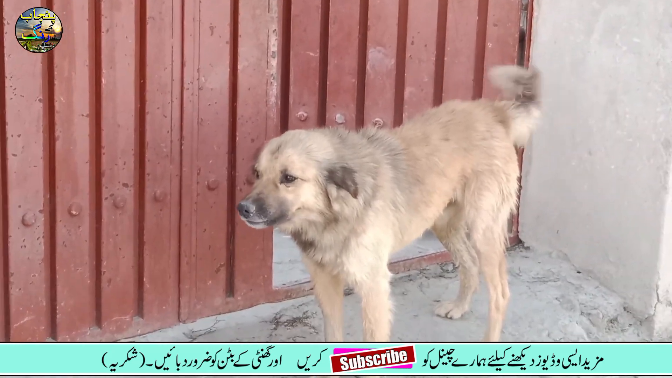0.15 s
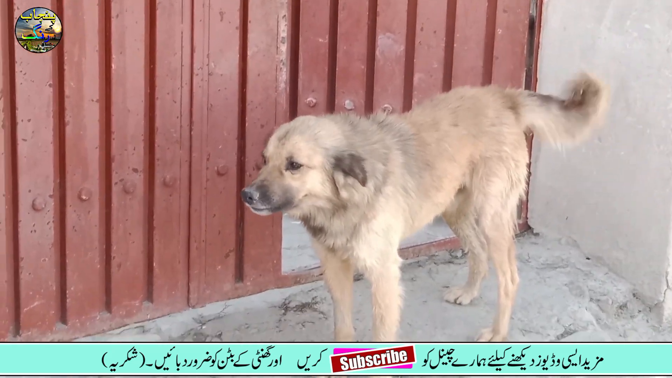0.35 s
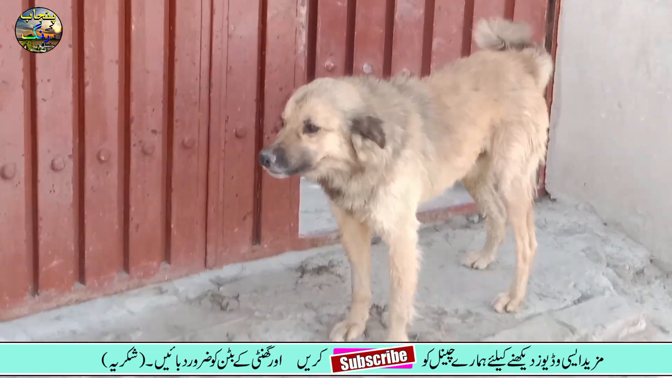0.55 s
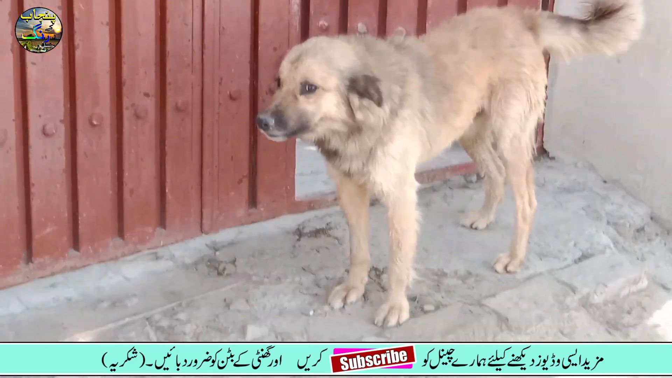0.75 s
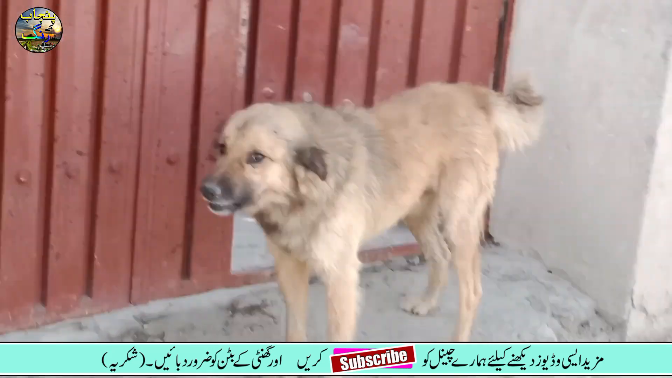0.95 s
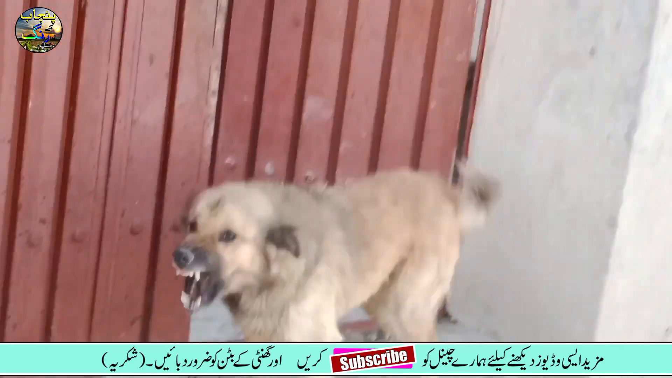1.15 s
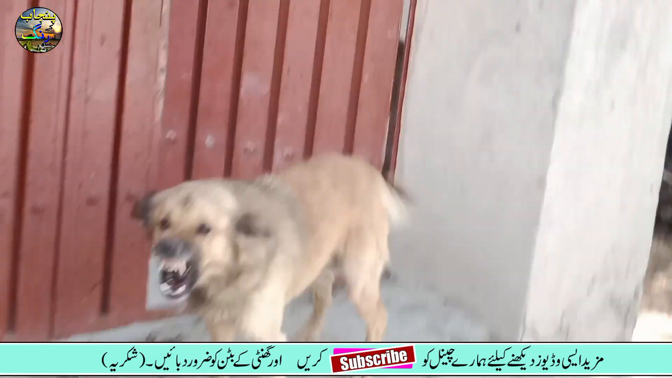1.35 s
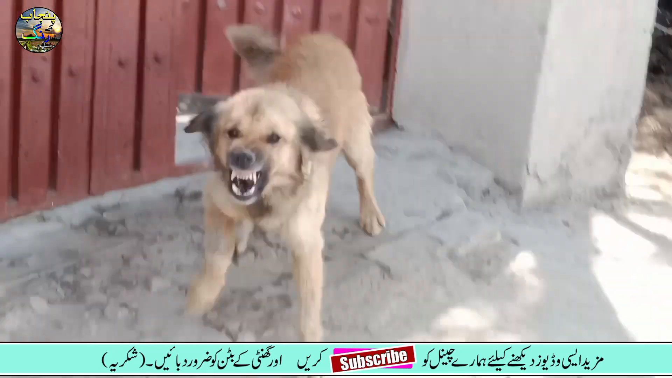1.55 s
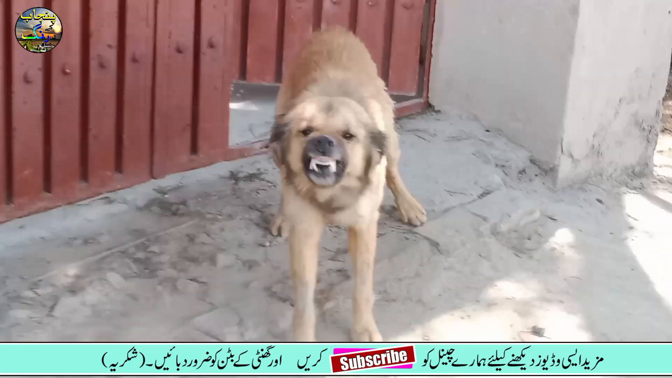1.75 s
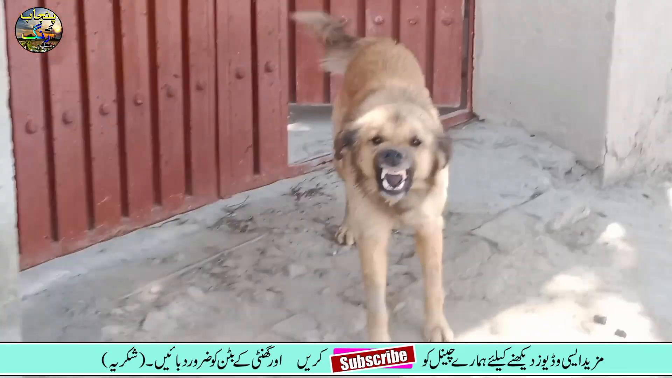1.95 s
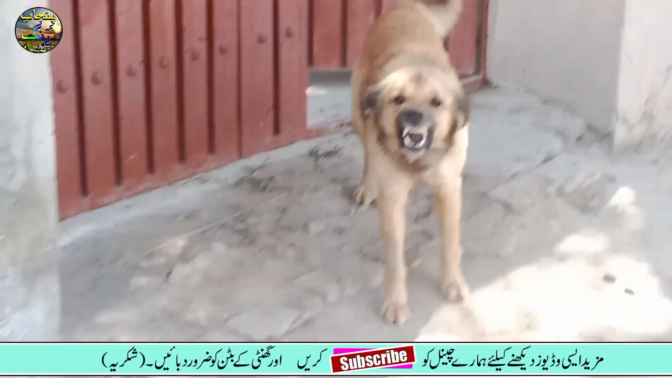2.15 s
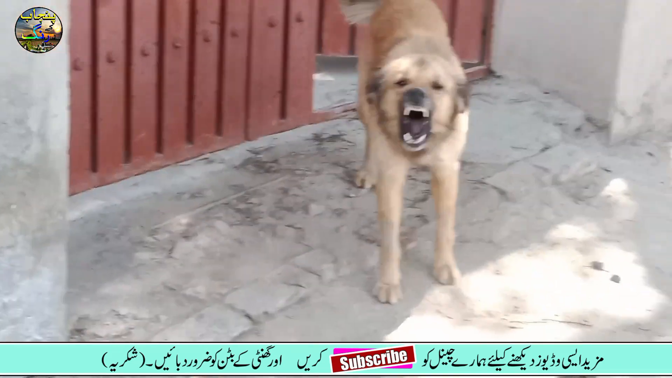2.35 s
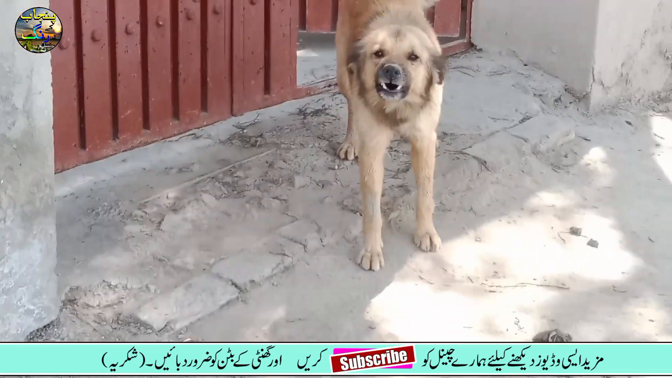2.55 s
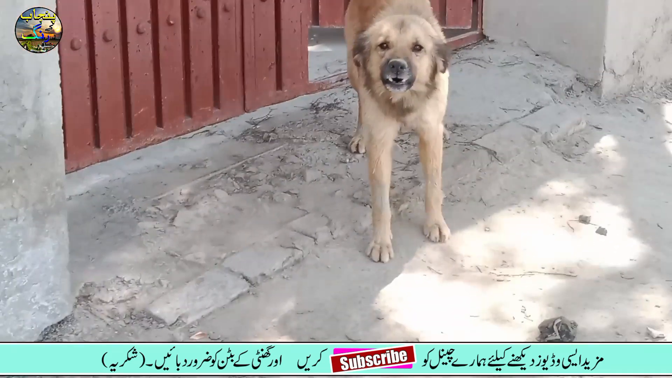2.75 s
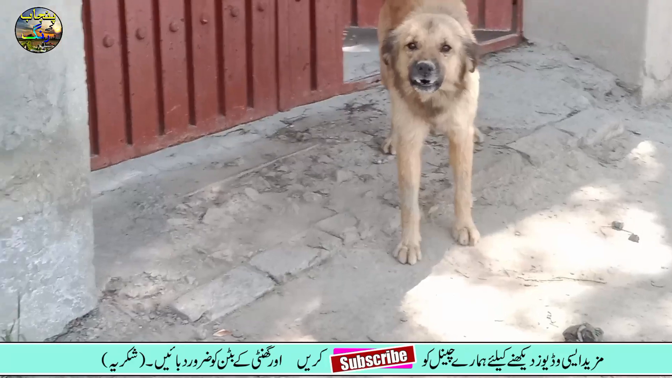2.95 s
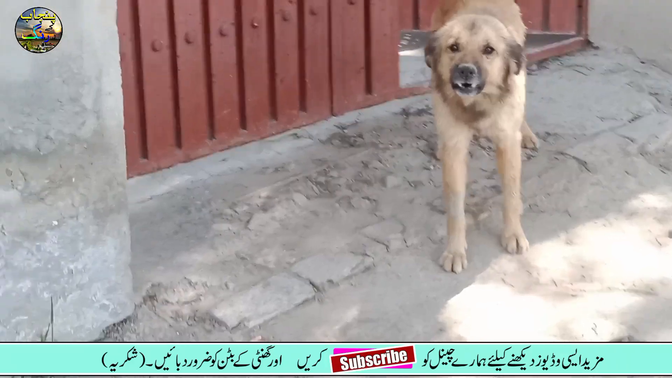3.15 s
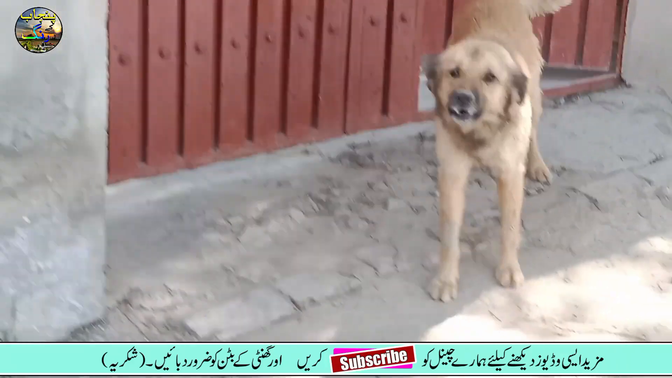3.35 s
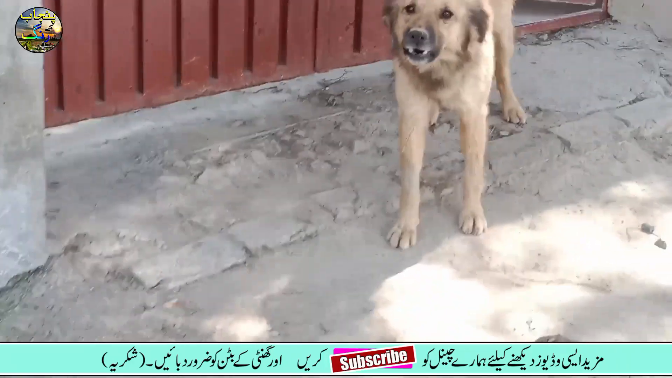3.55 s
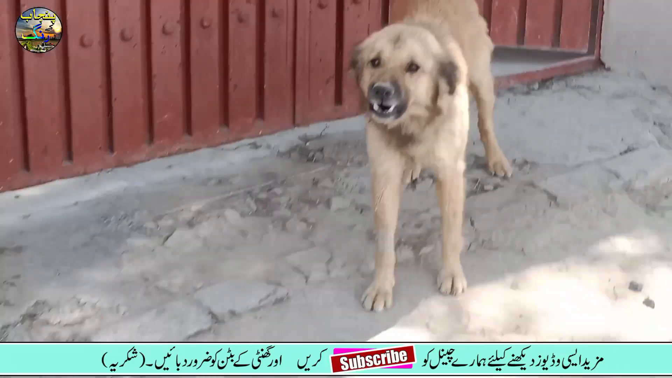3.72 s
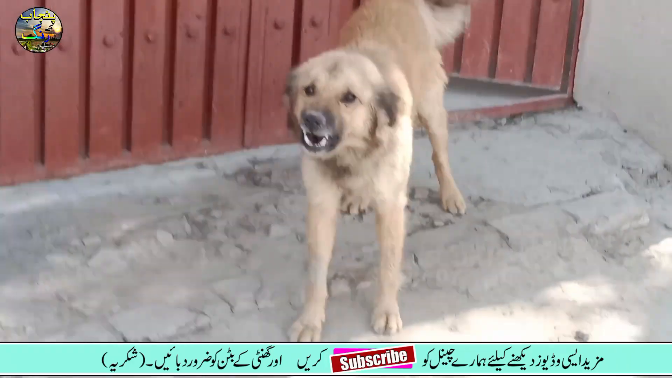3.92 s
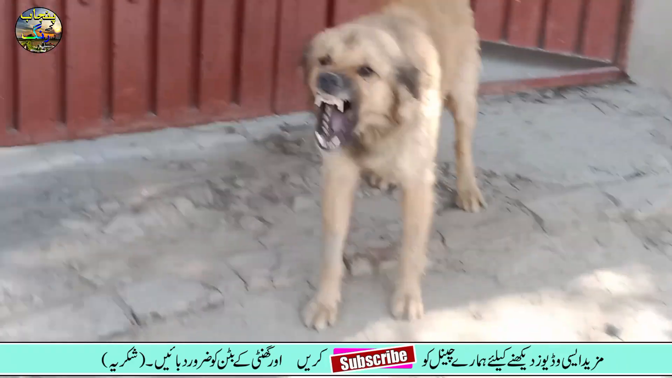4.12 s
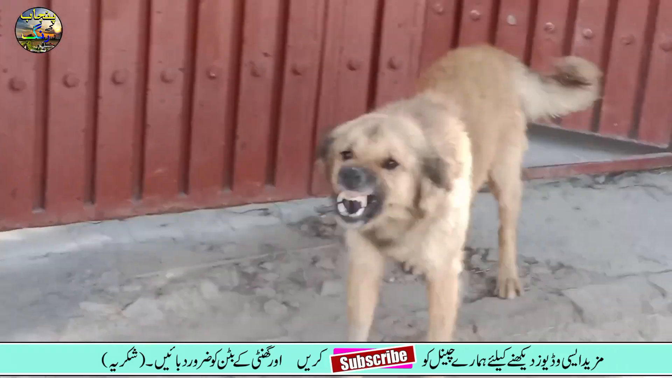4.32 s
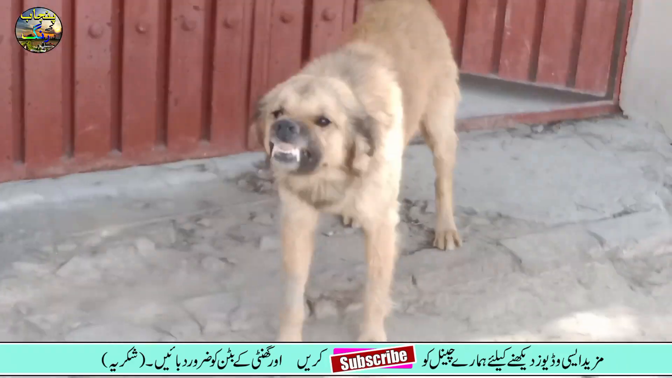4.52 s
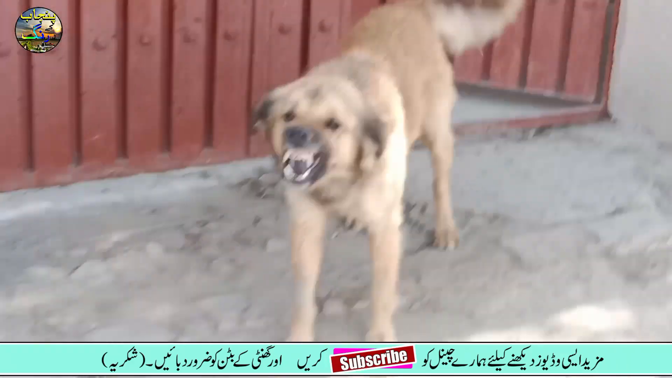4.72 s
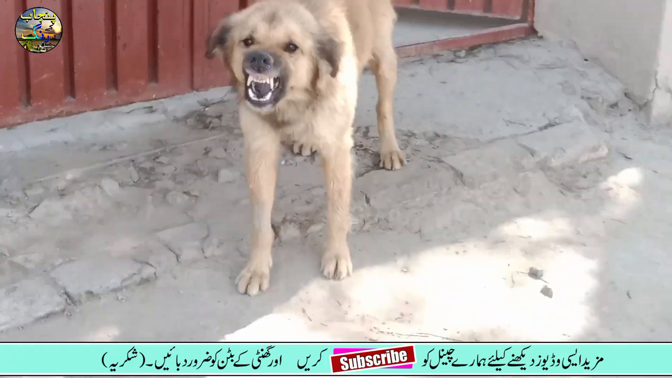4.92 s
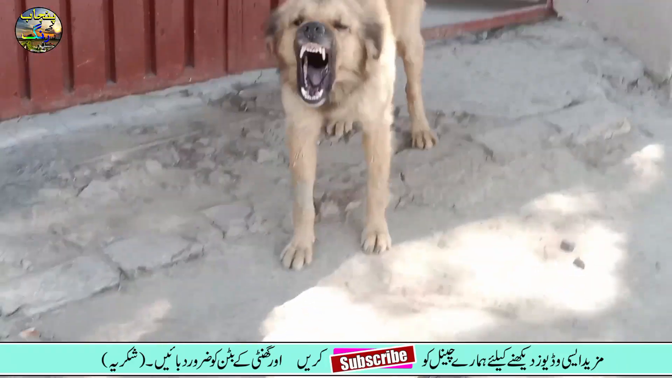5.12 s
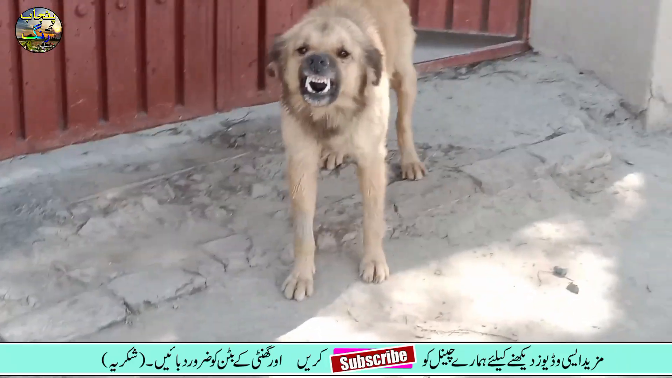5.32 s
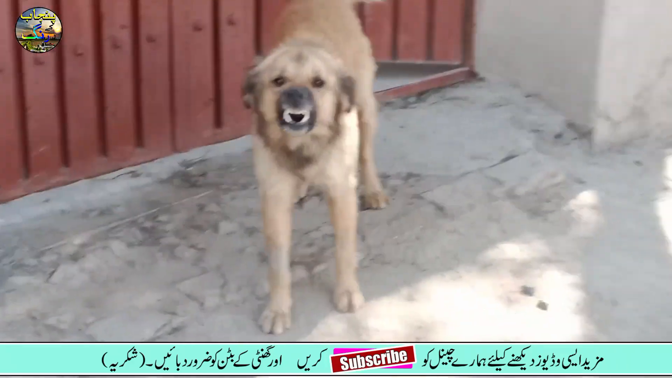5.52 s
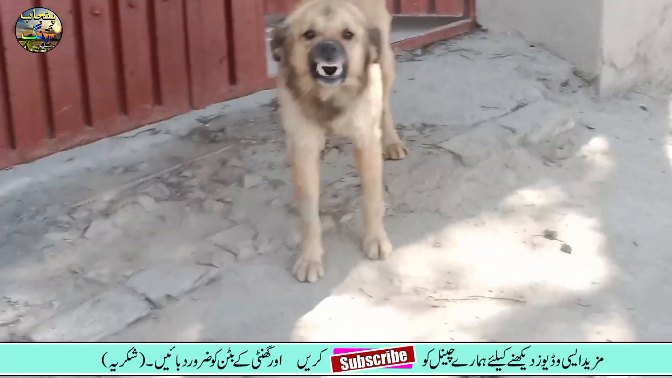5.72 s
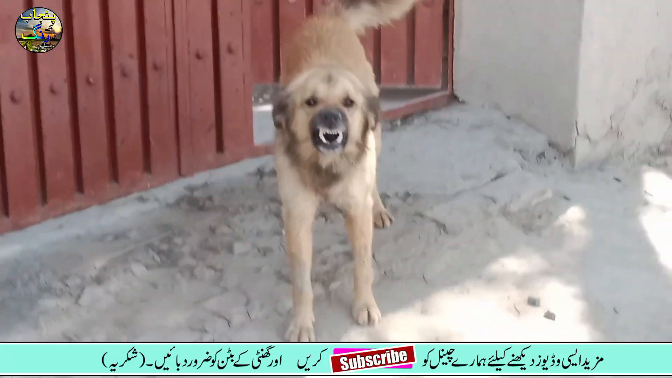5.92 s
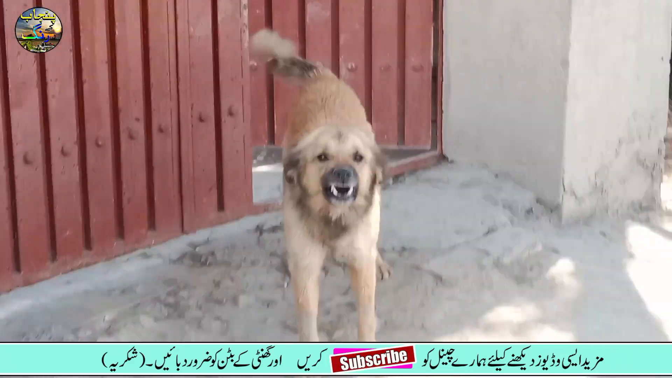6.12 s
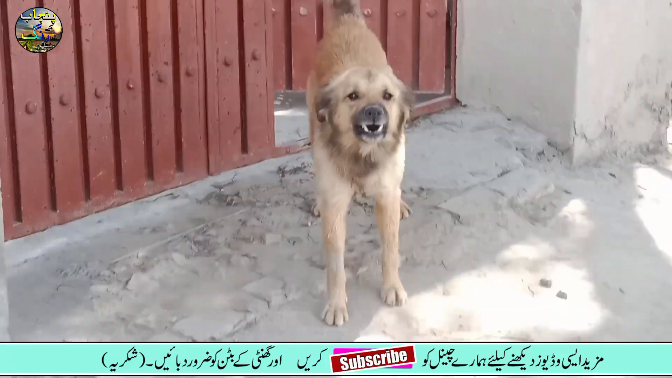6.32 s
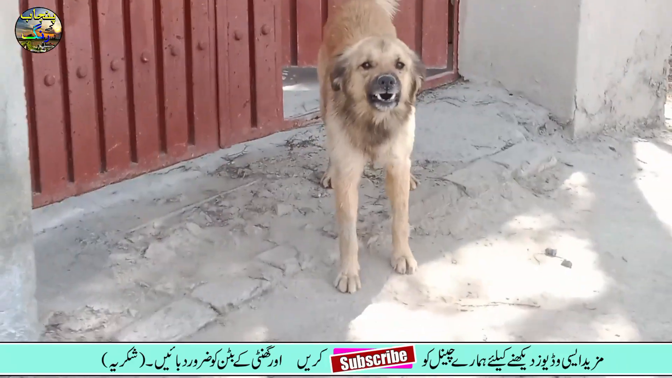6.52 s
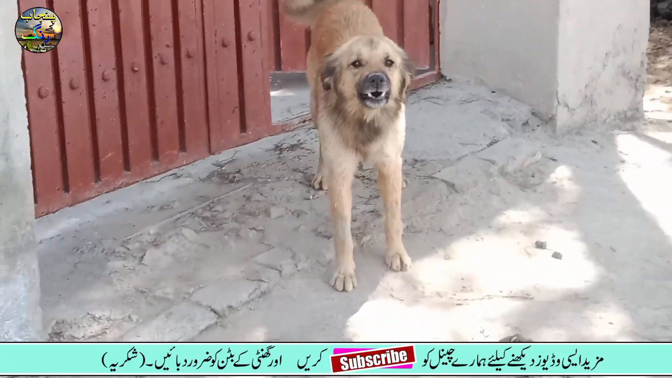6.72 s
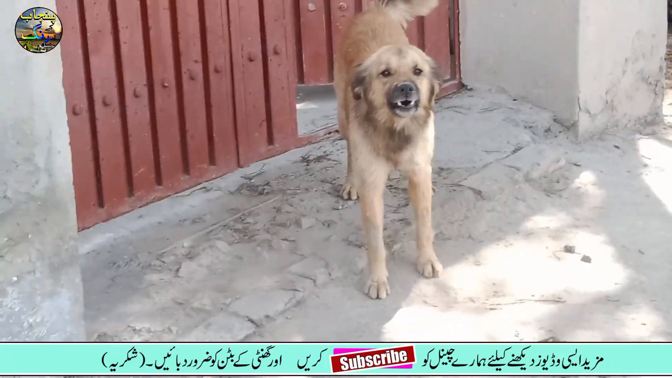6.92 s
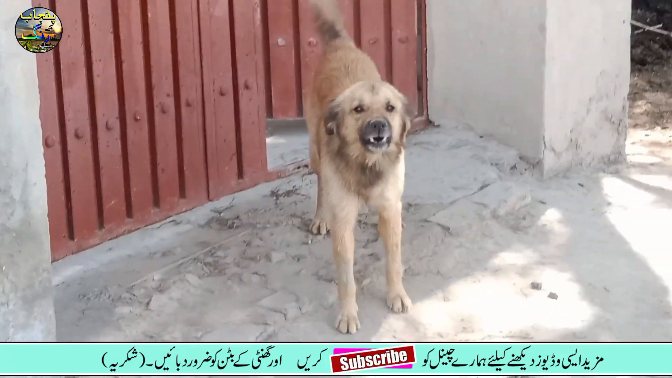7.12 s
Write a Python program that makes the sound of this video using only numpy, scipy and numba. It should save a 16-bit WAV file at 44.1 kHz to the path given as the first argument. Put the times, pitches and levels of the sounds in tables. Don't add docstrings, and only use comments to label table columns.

```python
import sys
import numpy as np
from scipy import signal
from scipy.fft import rfft, irfft
from scipy.io import wavfile
from scipy.ndimage import uniform_filter1d
from numba import njit

SR = 44100
rng = np.random.default_rng(int(sys.argv[2]) if len(sys.argv) > 2 else 0)


def field_ratio(decibels):
    return 10 ** (np.asarray(decibels, dtype=float) / 20)


def unload_wav(signal):
    wavfile.write(
        sys.argv[1],
        SR,
        np.round(np.clip(np.atleast_2d(signal).T, -1, 1) * 32767).astype(np.int16),
    )


N = 316197

# (folds start [s], they lock onto the throat [s], they let go [s], slack tail [s])
BARKS = [
    (1.195, 1.284, 1.35, .08),
    (1.433, 1.527, 1.58, .105),
    (1.696, 1.783, 1.84, .05),
    (2.384, 2.473, 2.525, .175),
    (4.141, 4.24, 4.314, .1),
    (4.443, 4.534, 4.607, .055),
    (5.112, 5.205, 5.243, .18),
]
# (locked pitch [Hz], pitch at letting go [Hz], roughness while locked [0-1],
# tongue resonance [Hz], lips resonance [Hz])
YELPS = [(718, 574, .55, 1000, 1616), (670, 521, .08, 1057, 1660), (645.3, 518, .11, 1028, 1780),
         (643, 650, .08, 1000, 1717), (670.6, 574, .5, 992, 1400), (657.2, 545, 0, 1037, 1600),
         (651, 643, .07, 978, 1478)]


def play(tables, levels, fade_s=0.011):
    rows = np.vstack(tables)
    ends = np.cumsum([0, *map(len, tables)])
    apart = np.diff(rows[:, 0], prepend=-1, append=99)[ends] > .03
    for k, table in enumerate(map(np.array, tables)):
        for edge, side in ((0, -1), (1, 1)):
            if apart[k + edge]:
                silent = table[-edge].copy()
                silent[0] += side * fade_s
                silent[levels] = -110
                rows = np.vstack([rows, silent])
    rows = rows[np.argsort(rows[:, 0])]
    now = np.arange(N) / SR
    return [np.interp(now, rows[:, 0], column) for column in rows[:, 1:].T]


def walk(rate):
    hold = int(SR / rate)
    return uniform_filter1d(np.repeat(rng.standard_normal(N // hold + 1), hold), hold)[:N]


@njit
def svf(x, hz, width):
    y, band, low = np.empty(len(x)), 0., 0.
    for i in range(len(x)):
        g, damping = np.tan(np.pi * hz[i] / SR), width / hz[i]
        v = (band + g * (x[i] - low)) / (1 + g * (g + damping))
        low += 2 * g * v
        band = 2 * v - band
        y[i] = damping * v
    return y


@njit
def folds(hz, jitter, scatter_db, chance):
    pulses, phases = np.zeros(len(hz) + 1), np.empty(len(hz))
    phase, cycle = 0., 0
    for i in range(len(hz)):
        step = hz[i] * np.exp(jitter[i] * chance[cycle, 0]) / SR
        phase += step
        if phase >= 1:
            phase -= 1
            cycle += 1
            size = np.sqrt(SR / hz[i]) * 10 ** (scatter_db[i] * chance[cycle, 1] / 20)
            pulses[i] += size * phase / step
            pulses[i + 1] += size * (1 - phase / step)
        phases[i] = phase
    return pulses[:-1], phases


def larynx(hz, rough, jitter, scatter_db, puff):
    pulses, phase = folds(hz, jitter * rough, scatter_db * rough, rng.standard_normal((N // 40, 2)))
    air = np.exp(-phase / puff) * rng.standard_normal(N) / np.sqrt(puff / 2)
    return np.sqrt(1 - np.clip(rough, 0, 1) ** 2) * pulses + rough * air, air


def tract(x, modes, span_s, order=1):
    y = 0
    for k, (hz, width, db) in enumerate(modes):
        ring = x
        for _ in range(order):
            ring = svf(ring, hz + np.zeros(N), 1. * width)
        y = y + (-1) ** k * field_ratio(db) * ring
    size = int(span_s * SR)
    power = uniform_filter1d(uniform_filter1d(y ** 2, size), size)
    return y / np.sqrt(np.abs(power) + 1e-12)


def bark_gesture():
    t = np.arange(N) / SR
    hz, throat_hz, rough = np.full(N, 120.), np.full(N, 600.), np.full(N, .5)
    for (start, lock, free, _), (top_hz, free_hz, locked, *_) in zip(BARKS, YELPS):
        on = t >= start
        flap_hz = np.interp(t, [start, start + .03, lock], [130, 250, 310])
        arc = 1 - np.clip((t - lock) / (free - lock), 0, 1) ** 2
        yelp_hz = free_hz + (top_hz - free_hz) * arc
        slack_hz = 335 * np.exp(-(t - free) / .21) + (free_hz - 335) * np.exp(-np.abs(t - free) / .009)
        pitch = np.where(t < lock, flap_hz, np.where(t < free, yelp_hz, np.maximum(slack_hz, 95)))
        hz[on] = pitch[on]
        throat_times = [start, start + 0.041, lock, free, free + 0.073]
        throat_hz[on] = np.interp(t, throat_times, [460, 560, top_hz, max(free_hz, 580), 590])[on]
        rough_times = [lock - .012, lock + .006, free, free + .03]
        rough[on] = np.interp(t, rough_times, [.72, locked, locked, .5])[on]
    return uniform_filter1d(hz, 150), throat_hz, rough


def bark_effort():
    # (throat at the onset [dB], flapping [dB], yelping [dB], slack [dB],
    # mouth level added by the gape [dB])
    bark_levels = [(-51.5, -13.5, -10, -35, 0), (-34, -11.5, -10, -34.5, -0.5),
                   (-32.5, -13.5, -10.5, -41.5, 0.5), (-53, -13, -11, -35.5, 1),
                   (-39.5, -13.5, -10.5, -34.5, 1), (-37, -12.5, -10, -44, 0), (-48, -14, -8.5, -32, 1)]
    # (chest re throat [dB], mouth re throat [dB], hiss re throat [dB], tongue rise [Hz])
    stages = [
        (-4.5, -6.5, -13.5, 77.5),
        (-25, -6.5, -25, -6),
        (-38.5, -4, -25, 20),
        (-57, -6.5, -30, 89),
        (-45, -5.5, -30.5, 54.5),
        (-9, 0.5, -18, 61),
        (-13, -2, -20, 77.5),
    ]
    tables = []
    for (start, lock, free, tail), (*_, tongue_hz, lips_hz), levels in zip(BARKS, YELPS, bark_levels):
        onset, flap, yelp, slack, gape_db = levels
        yelp_peak = lock + .45 * (free - lock)
        times = [start, start + .042, lock - .012, yelp_peak, free, free + .022, free + tail]
        dbs = [onset, flap, flap - 0.5, yelp, yelp - 9.5, slack, slack - 9.5]
        tables.append([(s, db, chest, mouth + gape_db, hiss, tongue_hz + rise, lips_hz)
                       for s, db, (chest, mouth, hiss, rise) in zip(times, dbs, stages)])
    return play(tables, 1)


def bark():
    # (centre [Hz], width [Hz], level [dB])
    upper = [(1965, 870, 5.5), (2910, 920, -4)]
    # (centre [Hz], width [Hz], level [dB])
    hiss_modes = [(5564, 860, 8.5), (6980, 1000, 1), (7870, 970, 1.5), (10400, 1500, -16),
                  (12000, 3500, -13.5), (15200, 3500, -14.5)]
    db, chest_db, mouth_db, hiss_db, tongue_hz, lips_hz = bark_effort()
    hz, throat_hz, rough = bark_gesture()
    source, air = larynx(hz, rough, jitter=.12, scatter_db=7.5, puff=0.86)
    chest = tract(source + .8 * air, [(np.minimum(hz, 330), 110, 0)], .04, order=2)

    less_bass = signal.butter(4, 330, "high", fs=SR, output="sos")
    source, air = signal.sosfilt(less_bass, [source, air])
    throat = tract(source, [(throat_hz, 120, 0), (throat_hz * 1.27, 150, -8)], 0.022, order=2)

    mouth_modes = [(tongue_hz, 170, 2), (1290, 170, -5), (lips_hz, 200, 2), (lips_hz * 1.156, 240, -5)]
    moving = [(f * (1 + .015 * walk(35)), w, g + 1.5 * walk(30)) for f, w, g in mouth_modes]
    mouth = tract(source + (0.62 + .5 * rough) * air, moving, 0.11, order=2)
    mouth = mouth + field_ratio(-11.5) * field_ratio(4.2 * walk(60)) * tract(0.36 * source + air, upper, 0.057, order=2)

    spray = air * field_ratio(3.5 * walk(120))
    clumps = [(f * (1 + .035 * walk(25)), w, g + 3.5 * walk(40)) for f, w, g in hiss_modes]
    gape_db = -4 + 1.3 * np.minimum(db + 16, 0)
    valley = tract(spray, [(3720, 570, 6.0), (4600, 990, -5)], 0.033, order=2)
    hiss = tract(spray, clumps, 0.06, order=2) + field_ratio(gape_db) * valley
    return field_ratio(db) * (throat + field_ratio(chest_db) * chest + field_ratio(mouth_db) * mouth + field_ratio(hiss_db) * hiss)


def growl():
    # (time [s], pitch [Hz], effort [dB], jaw opening [0-1], lips drawn back [0-1],
    # tongue resonance [Hz])
    shut = [
        (0, 82.7, -55.5, 0.35, 0.44, 870),
        (.21, 75.44, -55.5, 0, 0.61, 885),
        (.25, 72, -74.5, .1, 0.93, 830),
    ]
    lead = [
        (.93, 75.1, -74, .55, .1, 780),
        (.975, 77.8, -47.5, 0.4, 0.072, 780),
        (1.17, 91.3, -50.5, .57, 0.13, 860),
        (1.21, 101.2, -43.5, 0.31, .1, 870),
    ]
    middle = [
        (2.69, 100.7, -38, 0.8, 0.43, 1070),
        (2.87, 92.1, -43, 0.56, 0.14, 1104),
        (3.05, 84.7, -53, 0.67, .45, 1133),
        (3.3, 86.75, -55, 0.64, 0.42, 1100),
        (3.43, 83.1, -56, 0.6, 0.54, 1189),
        (3.77, 91.64, -57.5, 0.61, 0.43, 1150),
        (3.96, 107.4, -42, 0.66, 0.4, 1188),
        (4.066, 103, -43, 0.63, 0.33, 1234),
        (4.141, 115.7, -41, 0.66, 0.4, 1250),
    ]
    link = [
        (4.39, 104.3, -39.5, .9, 0.64, 1060),
        (4.458, 107.3, -42, 0.68, 0.71, 1028),
    ]
    last = [
        (5.43, 95.4, -39.5, 0.7, 0.56, 1140),
        (5.781, 93.46, -42.5, 0.73, 0.15, 1196),
        (5.971, 91.12, -42.5, 0.83, 0.49, 1160),
        (6.198, 92.73, -45.5, .88, 0.21, 1059),
        (6.33, 92.37, -46, 0.99, 0.31, 1070),
        (6.42, 91.3, -46.5, 0.85, 0.65, 1051),
        (6.62, 89.16, -52, 0.88, 0.64, 1035),
        (6.86, 87.4, -55.5, 0.63, 0.39, 1070),
        (7.17, 85.4, -61.5, 0.61, 0.68, 1124),
    ]
    # (time [s], level [dB])
    leak = [
        [(0, -74), (.21, -76)],
        [(1.07, -70.5), (1.19, -70.5)],
        [(2.69, -62.5), (2.95, -77.5), (3.22, -78), (3.45, -71.5), (3.82, -69), (4.14, -55)],
        [(5.43, -57), (5.68, -67), (6.65, -68.5), (6.85, -78), (7.0, -78), (7.17, -71)],
    ]
    # (centre [Hz], width [Hz], level [dB])
    teeth = [(4200, 980, -12), (5690, 820, 4.5), (6165, 220, 1.5), (6710, 1100, 1), (8283, 930, -14),
             (10700, 1300, -19)]
    # (centre [Hz], width [Hz], level [dB])
    upper = [(2244, 280, -8.5), (2570, 150, -9), (2872, 150, -9.5), (3190, 150, -16)]
    hz, effort_db, jaw, lips, tongue_hz = play([shut, lead, middle, link, last], 2, fade_s=0.079)

    throat_db = 37 * (jaw - 0.58)
    body_db = effort_db - np.maximum(throat_db, 0)
    throat_open_hz = 465.9 + 2.1 * (hz - 90)
    throat_hz = 400 + np.clip(4 * jaw - 1, 0, 1) * (throat_open_hz - 400)
    tongue_db = -4.5 + 0.3 * np.minimum(throat_db, 0)
    lips_db, lips_hz = 30.5 * (lips - 0.68), 1353 + 446 * lips
    nose_db = np.interp(tongue_hz, [900, 1000], [4, -3]) - 0.64 * np.maximum(throat_db, 0)

    rough = np.interp(throat_hz, [420, 445], [.25, .42])
    source, air = larynx(hz, rough, jitter=.125, scatter_db=6, puff=.7)
    nose = tract(source, [(174, 360, -6.0), (249.4, 46, 14.0)], 0.034, order=2)
    chest = tract(source, [(hz, 40, 0)], 0.091) + field_ratio(nose_db) * nose
    throat_modes = [(throat_hz * (1 + .012 * walk(12)), 60, 0), (throat_hz * 1.24, 110, -9),
                    (350, 60, -17), (730, 140, -18)]
    throat = tract(source, throat_modes, .06, order=2)
    body = field_ratio(body_db) * (chest / np.sqrt(1 + field_ratio(2 * nose_db)) + field_ratio(throat_db) * throat)

    tongue_modes = [(tongue_hz * (1 + .01 * walk(9)), 100, 0), (tongue_hz * .87, 130, -5),
                    (tongue_hz * 1.17, 200, -9)]
    tongue = tract(source + .3 * air, tongue_modes, .07, order=2)
    lip_modes = [(lips_hz, 330, 0), (lips_hz * 1.227, 300, 12 * lips - 12), *upper]
    moving = [(f * (1 + .015 * walk(14)), w, g + 3 * walk(12)) for f, w, g in lip_modes]
    hoarse = .7 * source + air
    mouth = field_ratio(effort_db) * (field_ratio(tongue_db) * tongue + field_ratio(lips_db) * tract(hoarse, moving, 0.057, order=2))

    teeth_db = play(leak, 1, fade_s=.05)[0] + 2.3 + 2 * walk(29)
    flickering = [(f, w, g + 4 * walk(5.4)) for f, w, g in teeth]
    return body + mouth + field_ratio(teeth_db) * tract(air, flickering, 0.044, order=2)


def gasp():
    # (time [s], airflow [dB], airflow sag [dB/s], throat re airflow [dB], extra throat sag [dB/s])
    breaths = [
        (1.887, -35.5, 107.5, 8, 55),
        (4.667, -36, 78, 2, -12.5),
    ]
    # (centre [Hz], width [Hz], level [dB])
    hollows = [
        [(110, 23, 0.5), (231, 37, 0.5)],
        [(650, 240, 5), (860, 150, -3.5)],
        [(1250, 1800, 2.5), (1750, 1100, 8.5), (2600, 1100, 5.5)],
        [(3320, 950, -5.5), (4180, 300, -1), (4700, 400, -10.5), (6160, 2000, -20.5), (7814, 1800, -21),
         (12100, 4400, -34)],
    ]
    length_s, rise_s, close_s = 0.322, 0.046, 0.071
    held_s = length_s - rise_s - close_s
    flow = []
    for s, db, fall, throat_db, sag in breaths:
        flow.append([(s, db - 18, 0),
                     (s + rise_s, db, throat_db),
                     (s + length_s - close_s, db - fall * held_s, throat_db - sag * held_s),
                     (s + length_s, db - 61.5, throat_db)])
    db, throat_db = play(flow, 1)
    source, air = larynx(np.full(N, 60.), np.full(N, .8), jitter=0.49, scatter_db=1.5, puff=1.0)
    parts = [tract(source + k * .5 * air, modes, 0.097, order=2) for k, modes in enumerate(hollows)]
    balance_db = (-3.5, throat_db, 0.5, -1)
    return field_ratio(db) * sum(field_ratio(g) * part for g, part in zip(balance_db, parts))


def flaps():
    # (time [s], peak level [dB], ring [Hz])
    slaps = [
        (1.939, -48, 670),
        (1.989, -28, 783),
        (4.691, -28, 670),
        (4.75, -18.5, 760),
        (4.794, -22.5, 740),
        (4.843, -30.5, 780),
        (4.925, -44, 618),
    ]
    out, t = np.zeros(N), np.arange(SR // 40) / SR
    for s, db, hz in slaps:
        i = int(s * SR)
        swell = np.e * t / 0.0029 * np.exp(-t / 0.0022)
        out[i:i + len(t)] += field_ratio(db) * swell * np.sin(2 * np.pi * hz * t)
    return out


def paws():
    # (peak time [s], level [dB], rise [s], fall [dB/s])
    scuffs = [
        (0.956, -34.5, 0.011, 448),
        (1.028, -43.5, .06, 404),
        (6.706, -50.5, 0.056, 702),
        (6.791, -42, .1, 485),
    ]
    # (frequency [Hz], level [dB per Hz])
    grit_colour = np.array([(650, -30.5), (1100, -19.5), (1370, -4), (3320, -5.5), (6190, -18.5),
                            (7450, -13), (9480, -38.5), (15000, -30)])
    # (time [s], peak level [dB], pitch [Hz])
    ticks = [
        (4.037, -26.5, 2284),
        (5.7113, -39, 5000),
        (5.9944, -36.5, 4200),
        (6.771, -25, 6600),
    ]
    grains = rng.standard_normal(N) * field_ratio(2.54 * rng.exponential(size=N)) * (rng.random(N) < .6)
    log_hz = np.log(np.arange(N // 2 + 1) * SR / N + 1)
    colour_db = np.interp(log_hz, np.log(grit_colour[:, 0]), grit_colour[:, 1])
    grit = irfft(rfft(grains) * field_ratio(colour_db), N)
    now = np.arange(N) / SR
    drag = 0
    for s, db, rise, fall in scuffs:
        drag = drag + field_ratio(db - np.where(now < s, 40 * (s - now) / rise, fall * (now - s)))
    out = drag * grit / np.std(grit)
    t = np.arange(200) / SR
    for s, db, hz in ticks:
        i = int(s * SR)
        out[i:i + len(t)] += field_ratio(db) * np.exp(-t * hz / 1.1) * np.sin(2 * np.pi * hz * t)
    return out


def yard(x):
    # (delay [s], level [dB])
    echoes = [
        (.147, -17.5),
        (.294, -37),
        (.44, -62),
    ]
    # (pitch [Hz], level [dB], time to fall 60 dB [s])
    panels = [
        (591, -37.5, 0.8),
        (646, -28.5, 0.4),
    ]
    t = np.arange(SR // 2 + SR // 4) / SR
    tail = rng.standard_normal(len(t)) * 1000 ** (-t / 0.14) * np.clip(t / 0.0022, 0, 1)
    reply = field_ratio(-9.5) * tail / np.sqrt(np.sum(tail ** 2))
    for s, db in echoes:
        reply[int(s * SR)] += field_ratio(db)
    for hz, db, t60 in panels:
        reply += field_ratio(db - 39.5) * 1000 ** (-t / t60) * np.sin(2 * np.pi * hz * t)
    dull = signal.sosfilt(signal.butter(2, [350, 3100], "bandpass", fs=SR, output="sos"), x)
    return signal.fftconvolve(dull, reply)[:N]


def hush():
    return field_ratio(-79.5) * rng.standard_normal(N)


def scene():
    near = bark() + growl() + gasp() + flaps() + paws()
    return (near + yard(near) + hush())[None]


def phone_gate(x):
    # (frequency [Hz], level [dB])
    thresholds = np.array([(100, -55.5), (400, -44), (1500, -48), (4000, -56), (9000, -65.5)])
    hz, _, z = signal.stft(x, SR, nperseg=1024)
    power = uniform_filter1d(uniform_filter1d(np.abs(z) ** 2, size=3, axis=1), size=3, axis=2) + 1e-18
    edge_db = np.interp(np.log(hz + 1), np.log(thresholds[:, 0]), thresholds[:, 1]) - 34.0
    edge = field_ratio(edge_db)[:, None] ** 2
    gain = np.maximum(power ** 2 / (power ** 2 + edge ** 2), field_ratio(-16))
    return signal.istft(z * gain, SR, nperseg=1024)[1][:, :N]


def low_pass(x):
    return signal.sosfilt(signal.butter(12, 15690, fs=SR, output="sos"), x)


def record(dry):
    rounded = np.tanh(1.05 * dry) / 1.05
    thinned = signal.sosfilt(signal.butter(2, 60, "high", fs=SR, output="sos"), rounded)
    return low_pass(phone_gate(thinned))


dry = scene()
out = record(dry)
unload_wav(out)
```